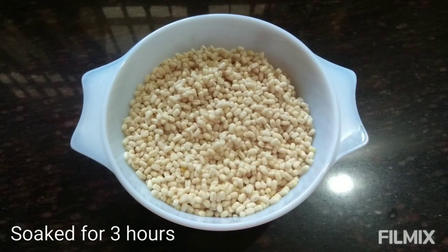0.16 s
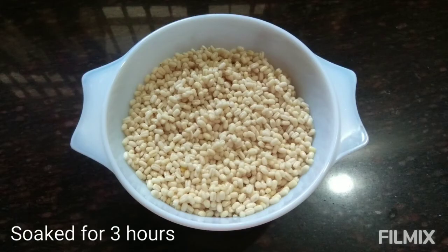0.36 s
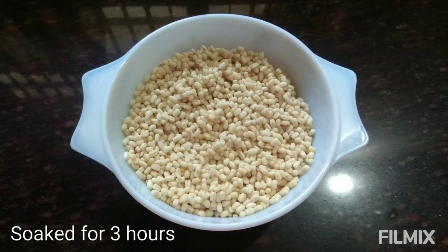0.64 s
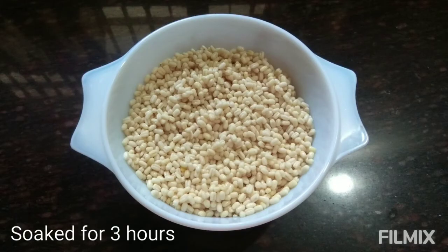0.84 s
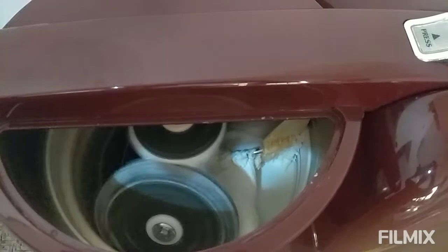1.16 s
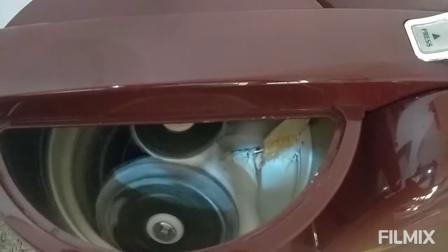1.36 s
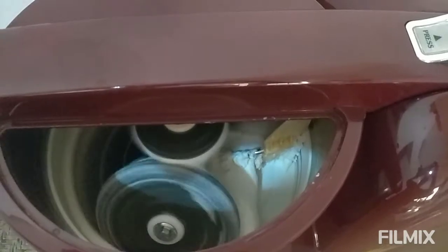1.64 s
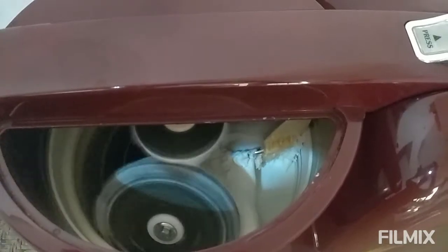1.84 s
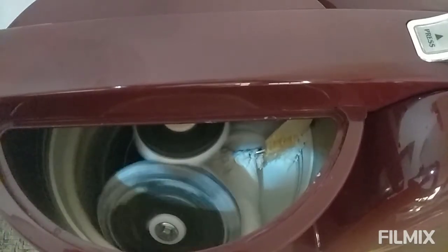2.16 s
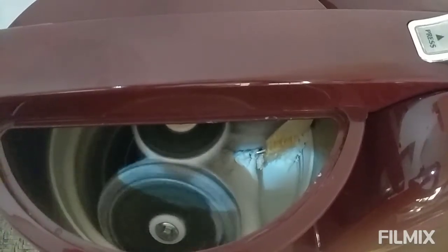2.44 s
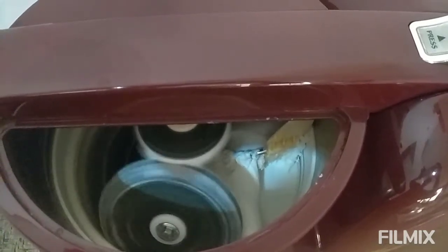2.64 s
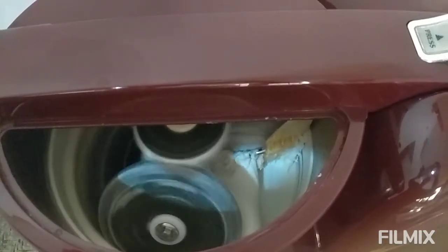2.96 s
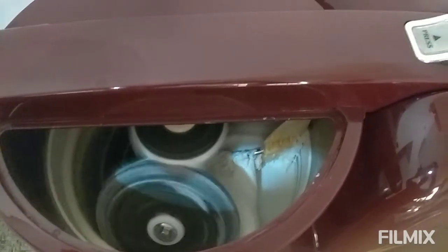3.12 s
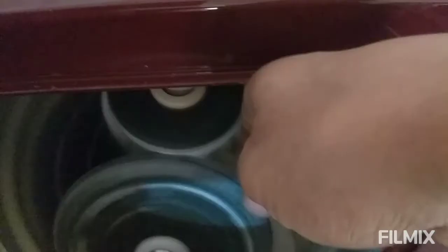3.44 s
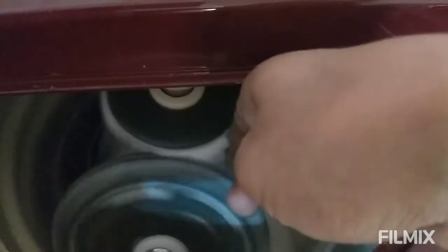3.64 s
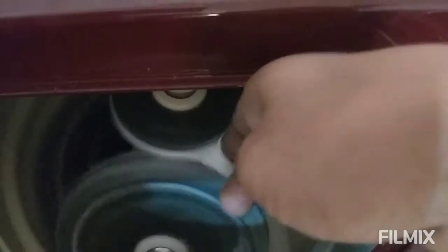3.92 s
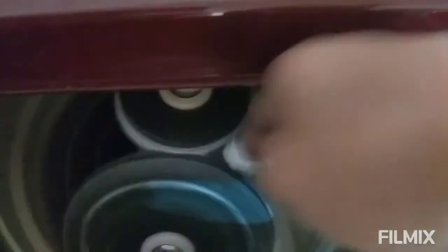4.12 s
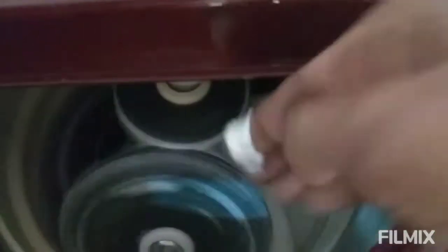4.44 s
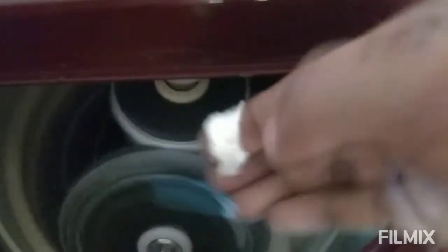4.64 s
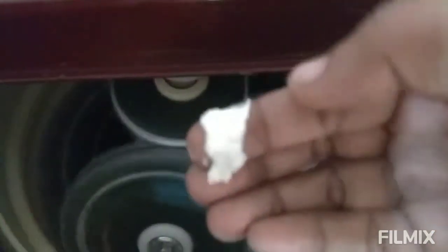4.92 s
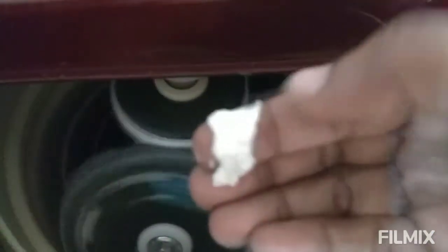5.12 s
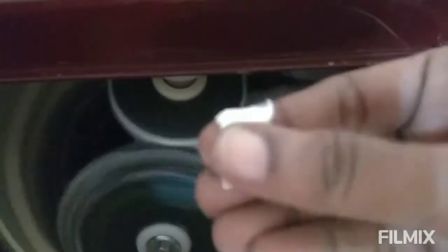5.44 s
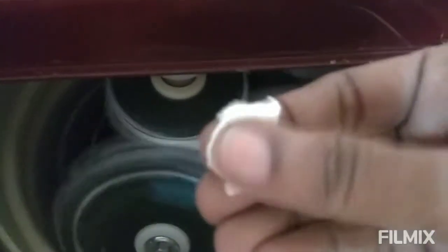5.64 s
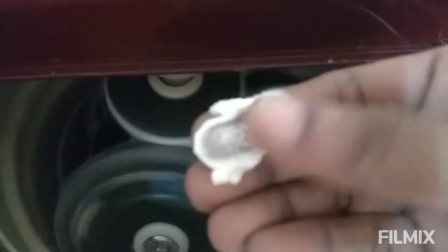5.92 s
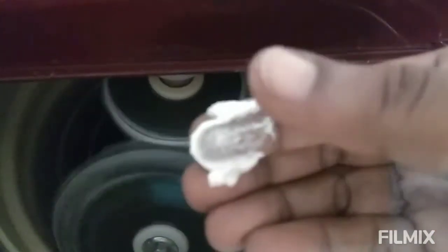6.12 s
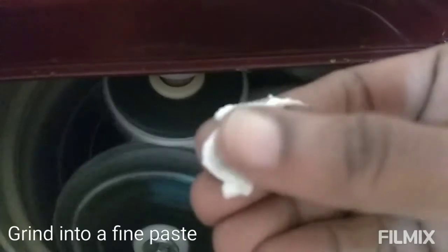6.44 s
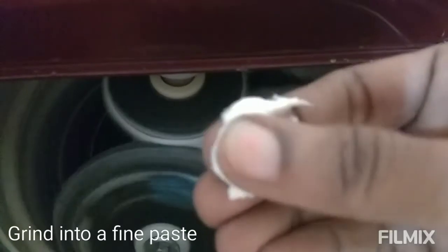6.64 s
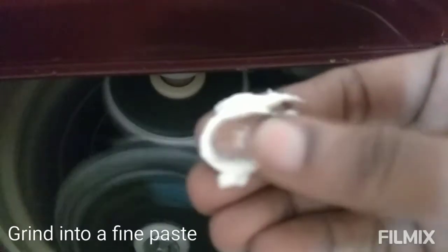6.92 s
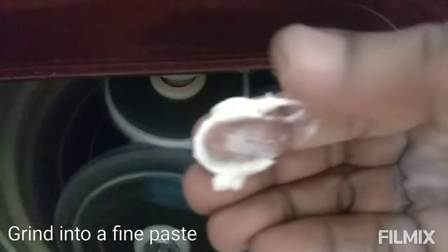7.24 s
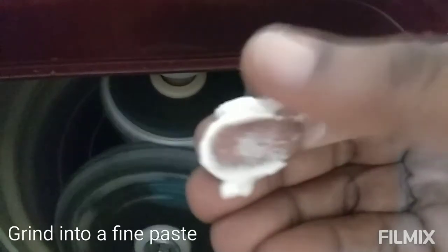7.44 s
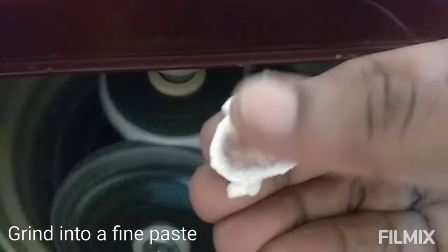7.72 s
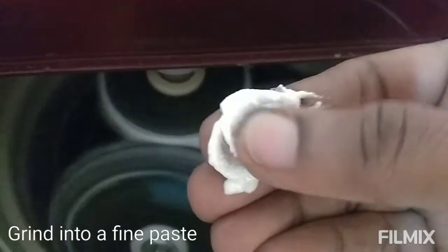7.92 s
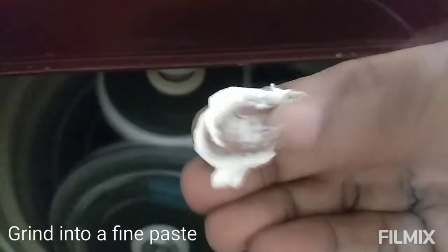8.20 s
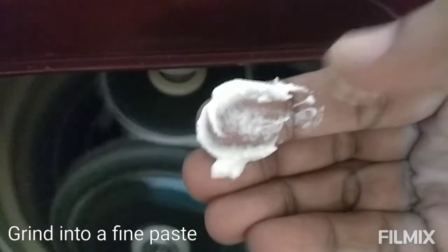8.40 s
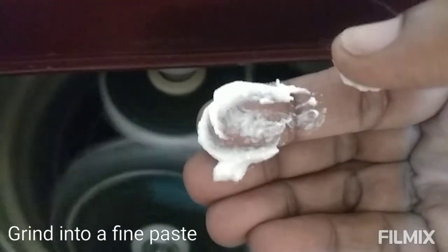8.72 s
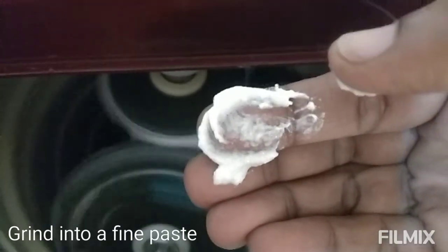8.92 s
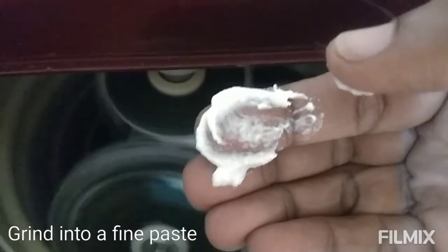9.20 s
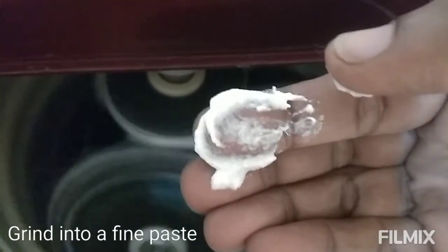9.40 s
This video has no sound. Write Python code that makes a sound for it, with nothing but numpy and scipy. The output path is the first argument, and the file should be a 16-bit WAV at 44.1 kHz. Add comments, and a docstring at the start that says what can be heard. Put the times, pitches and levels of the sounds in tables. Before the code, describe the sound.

It starts in silence. At about 0.9 seconds a tabletop wet grinder fades in, heard from above its lid in a kitchen. Stone rollers make a steady, gritty rumble on the stone floor of the drum and ring the housing, over a faint hiss of motor air. Lentil batter fizzes high above the rumble, swelling with every turn, about every 0.8 seconds, with small squelches and tiny bubble pops. Soft knocks come near 1.5 and 3.2 seconds as a roller drops off a lump. At 3.4 seconds the sound cuts out briefly, then fades straight back in, close to the lid's opening. The grinding continues, slowly growing louder. Sharper bubbles snap in clusters from about 5.4 to 9 seconds, and more knocks land, the clearest near 5.4 and 8.6 seconds. The grinder is still turning at the end, around 9.5 seconds.

```python
"""A tabletop wet grinder in a kitchen fades in at 0.9 s, the microphone above the lid. Over a faint hiss of
motor air, stone rollers rumble on the stone floor of the drum and ring its housing. Lentil batter fizzes
under them, swells on every 0.8 s turn, squelches and spits small bubbles; now and then a roller knocks
down off a lump. At 3.4 s the sound drops out briefly and returns with the microphone close at the
opening of the lid. Throughout, the grinding grows slowly louder."""
import sys
import numpy as np
from scipy import signal
from scipy.fft import rfft, irfft, next_fast_len
from scipy.io import wavfile
from scipy.ndimage import uniform_filter1d, map_coordinates

SR = 44100
rng = np.random.default_rng(int(sys.argv[2]) if len(sys.argv) > 2 else 0)


def master(y):
    """Save y as 16-bit WAV."""
    cut = np.clip(np.atleast_2d(y).T, -1, 1)
    pcm = np.round(cut * 32767)  # scale
    wavfile.write(sys.argv[1], SR, pcm.astype(np.int16))


N = 421596

TURN_S, MOVE_S = .802, 3.4  # one turn of the drum; when the microphone moves in
GROWTH_DB_PER_S = (1.3035, 1.51, 1.1644)  # rumble, squeezed batter, fizzing film

# Cooling air from the motor. Each row: frequency in Hz, relative level in dB.
MOTOR_AIR = [(300, 13), (1500, -25), (2700, 26), (3500, -32), (5000, 24.5), (8000, -40), (12000, 11),
             (15800, 27.5)]
# Stone rolling on stone, from above the lid (far) and at its opening (close).
# Each row: frequency in Hz, relative level in dB.
STONE_FAR = [(25, -28), (75, -32), (105, -12.5), (125, -5), (165, -7), (220, -1), (330, -3.5), (480, -7),
             (630, -12), (850, -9.5), (1250, -11), (1800, -15), (3300, -34.5), (6000, -34.5), (12000, -53)]
STONE_CLOSE = [(25, -34), (80, -24), (105, -20), (125, -12), (200, -2.5), (330, -7.5), (480, -9.5),
               (630, -14), (850, -11.5), (1250, -14.5), (1800, -22.5), (3300, -33.5), (6000, -53.5),
               (12000, -71)]
# Resonances of drum and housing. Each row: frequency in Hz, width in Hz, lift in dB.
DRUM_MODES = [(123.7, 19, 10), (177, 11, 6), (204.3, 27.2, 12), (240.7, 8.1, 10.5), (291.8, 24, 11.5),
              (328, 6.7, 8.5), (377.7, 12.3, 13.5), (450, 10.8, 14.5), (522.4, 17, 6.5), (553.8, 23, 12.5),
              (672, 90, 7.5), (772, 56, 11), (825.6, 10.3, 10), (890, 24, -0.5), (987, 24, 8.5),
              (1129, 41, 5.5), (1303, 20, 6.5), (2004, 12, 9), (2560, 360, 8)]
# What every turn repeats, at each position. Each row: seconds into the turn, then the lifts in dB of
# rumble, squeezed batter and fizzing film.
TURN_FAR = [(.02, 0, -7, -0.5), (.13, -0.9, -5, -2), (.24, -2, -12, -0.5), (.29, -1.5, -0.5, 3),
            (.36, -1.2, 11, -1), (.44, -1, -5.5, 0.5), (.5, -1, 1, -0.5), (.58, -0.5, -20, -1),
            (.69, 0, -14, -2), (0.771, -1, -12, -1.5)]
TURN_CLOSE = [(.04, -0.27, 3, 0.5), (.15, -0.74, 4, 1), (.2, -0.17, -11, 2.6), (.26, -0.23, 2, 3),
              (.34, 0.69, 7, 4), (.42, 0.48, 1.5, 1), (.45, -0.54, -0.5, 4), (.52, -.3, 1.5, 2),
              (.6, -0.062, 5.5, 2), (.68, -0.95, 4, 1.1), (.75, -0.29, 5.5, -2)]
# Brief swells, low booms and dips in the rumble and its gritty top. Each row: time in seconds,
# lift of the rumble in dB, further lift of its gritty top in dB, half length in seconds.
SWELLS = [(1.19, 4, -2, 0.013), (1.535, 4, 1, 0.093), (1.775, -2, -3.5, 0.054), (1.95, 3.5, -1, 0.05),
          (2.38, 5, -2, 0.053), (2.678, 2.5, 1.5, 0.028), (2.795, 0.5, 1, .04), (3.037, 4, -1.5, 0.082),
          (3.25, 3.5, 0, 0.022), (3.602, 2, -2, 0.033), (3.746, 2.5, -3, 0.028), (3.88, 0, 2.5, .05),
          (4.124, 0, -4, 0.058), (4.252, 3, 1, .03), (4.342, 2.5, -3, 0.035), (4.583, -1, -0.5, 0.044),
          (4.742, 1.5, 2.5, 0.02), (4.78, 7.5, -8, 0.013), (4.935, -2, -1.5, 0.06), (5.07, 1, -0.5, 0.026),
          (5.3, -3, 3, 0.038), (5.415, 4.5, -3, .018), (5.498, 2.5, -2, .014), (5.656, 2, -5, 0.05),
          (6.19, 2, 1.5, 0.07), (6.526, -0.5, -4, 0.055), (6.794, 2, 1, 0.062), (6.895, 0, 6.5, 0.04),
          (7.49, 2, 1, 0.06), (7.615, 5, -2, 0.054), (7.88, -3, 4, 0.029), (8.51, 2.5, -1, .02),
          (8.586, 4.5, -0.5, 0.047), (8.8, 4, -4.5, 0.022), (8.98, 3, -1.5, 0.051), (9.48, 0, -0.5, .05)]
# Batter squeezed out beside the rollers. Each row: frequency in Hz, relative level in dB.
SQUEEZE_TONE = [(2000, -39), (3300, -9), (3950, 4.5), (4600, -7), (5500, 7.5), (6600, 4.5), (8000, 12),
                (10000, -50.5), (15000, -14)]
# The fizzing film of batter, at each position. Each row: frequency in Hz, relative level in dB.
FILM_FAR = [(3000, -13.5), (5800, -16), (7200, -7.5), (8300, -2.5), (9500, 1), (12800, 4.5), (14000, -4),
            (15800, -3)]
FILM_CLOSE = [(3000, -26.5), (6000, -9), (8300, -3), (8800, 6.5), (10200, 6), (12500, 5.5), (14000, 0),
              (15800, -7)]
# Bands where the fizz thins on every turn. Each row: seconds into the turn, centre in Hz, glide in
# octaves per second, level change in dB from above the lid, the same from close.
HOLLOWS = [(.125, 7800, 6.5, -30, -24), (.45, 9630, 2, -19, -13), (.645, 9000, 3, -21, 2.5)]
# High resonances of the steel drum wall. Each row: frequency in Hz, width in Hz, lift in dB.
STEEL_MODES = [(8730, 85, 8), (9300, 110, 2.5), (9742, 35, 1), (10150, 66, 7.5), (11000, 50, 4.5),
               (12050, 32, 5), (12800, 40, -3), (13700, 50, 4)]
# Folds of batter closing under a roller. Each row: time in seconds, relative level in dB, centre in Hz,
# glide in octaves per second, half length in seconds.
SQUELCHES = [(1.19, -35, 12700, 0, 0.014), (1.385, -25.5, 13000, 0, 0.016), (1.507, -36.5, 7670, -1, 0.068),
             (1.558, -28, 12700, 1, .018), (1.663, -35, 7900, 3.5, 0.022), (1.75, -25, 10960, 4, 0.015),
             (1.79, -22, 13600, -6, 0.012), (2.01, -34, 12500, -2, .016), (2.2, -32, 12900, 1, .018),
             (2.453, -27, 13300, -3, .012), (2.795, -33, 12800, -3, .018), (2.373, -26, 10460, 0.5, 0.02),
             (2.57, -26.5, 10500, -6, .014), (2.594, -38, 7550, -4.5, .015), (2.608, -23, 13300, -4, .016),
             (2.653, -25.5, 10770, -6, 0.019), (3.018, -28, 12000, 1, .008), (3.044, -23, 12500, -2, .004),
             (3.15, -29, 11900, -1, 0.017), (3.2, -33, 7860, 0, 0.046), (3.278, -28, 13200, 1, 0.016),
             (3.775, -35, 7870, 2, .03), (3.895, -29, 8657, 2, 0.025), (4.143, -25, 13000, -5, 0.018),
             (4.208, -43, 7550, -3, .025), (4.572, -45, 8200, 2, 0.02), (4.809, -29, 11200, -5, 0.013),
             (4.932, -33, 7400, -3, 0.015), (4.952, -28.5, 13200, -2, 0.024),
             (5.366, -20.5, 9840, -2.5, 0.022), (5.62, -25, 12600, 4, .016), (5.758, -20, 12550, -3, 0.013),
             (6.171, -20.5, 10400, 0, 0.024), (6.276, -23, 11900, 3.5, .03), (6.543, -26.5, 7680, -4, .025),
             (6.56, -23, 13800, -3, .024), (6.598, -20.5, 10300, -1.5, 0.013),
             (7.162, -29, 7950, 0.5, 0.037), (7.365, -18.5, 12900, -9, 0.012),
             (7.412, -21.5, 9300, -5.5, 0.034), (7.784, -20.5, 10170, -0.5, 0.026),
             (8.133, -18.5, 8530, -2, 0.018), (8.179, -18.5, 12600, -4, 0.036),
             (8.565, -28, 11500, -1, .04), (8.75, -32, 7500, 1, 0.021), (8.968, -21.5, 12800, -3, 0.032)]
# The loudest bubbles, and at 5.384 s a short crunch of stone just before the roller lands. Each row: time in
# seconds, relative level in dB, pitch in Hz, width in octaves.
LOUD_BUBBLES = [(1.2494, -31.5, 4060, 0.22), (1.2944, -20, 8500, 0.54), (1.4644, -33, 4370, 0.17),
                (1.8935, -20.5, 6640, 0.29), (2.2894, -25, 6900, .35), (2.7394, -29, 4230, 0.24),
                (2.7644, -31, 4700, 0.28), (2.9748, -21, 7000, 0.38), (3.2194, -25, 5970, 0.48),
                (4.3833, -31, 5500, 0.27), (4.5085, -27, 5170, 0.37), (4.9251, -38, 6000, .3),
                (5.0419, -29, 6300, 0.18), (5.2484, -34, 5600, .3), (5.2674, -27, 5400, .25),
                (5.3775, -16.5, 6800, .4), (5.384, -25, 3570, 0.19), (5.423, -20, 6500, .25),
                (5.432, -19, 6740, .2), (5.5334, -18, 7040, 0.32), (5.6702, -16.5, 6060, 0.25),
                (5.8558, -13.5, 6040, 0.32), (5.8765, -12.5, 6340, 0.33), (5.932, -10, 11000, 0.66),
                (5.9455, -9, 10800, 0.59), (6.0455, -22, 6300, 0.27), (6.108, -15, 7740, 0.41),
                (6.2505, -16, 6870, 0.49), (6.5545, -21, 5000, 0.3), (6.5744, -11, 11500, 0.64),
                (6.619, -21.5, 5000, 0.35), (6.6816, -29, 6500, .3), (6.6988, -12, 8100, 0.33),
                (6.904, -20, 6000, 0.38), (6.9227, -14, 6040, 0.42), (6.9625, -19, 5560, .25),
                (7.3117, -11.5, 7640, .2), (7.4179, -10, 9500, 0.4), (7.4704, -6, 11800, 0.44),
                (7.5122, -22, 6800, .25), (7.5322, -5.5, 7200, 0.37), (7.6275, -12, 7240, .5),
                (7.6697, -13, 5800, 0.51), (7.9128, -24, 6000, 0.24), (7.9894, -20, 5830, 0.25),
                (8.6416, -17, 6800, .25), (8.6885, -7.5, 7450, 0.34), (8.7324, -18, 6650, .2),
                (8.938, -22, 6400, .3), (8.955, -17, 5460, .32), (9.1778, -19.5, 5430, 0.22)]
# A roller drops off a lump. Each row: start in seconds, level in dB.
KNOCKS = [(1.49, -25), (3.22, -22), (4.328, -26.5), (5.388, -15), (5.603, -32), (7.479, -26),
          (8.588, -17.5)]
# The colour of that blow. Each row: frequency in Hz, relative level in dB.
KNOCK_TONE = [(110, -18), (200, -3), (310, 10), (450, -12), (800, -1), (1200, -4.5), (2000, -10.5),
              (2700, -25), (3400, -16), (6000, -31), (12000, -50)]
# How alike the two sides of the microphone hear the grinder. Each row: frequency in Hz, correlation.
LIKENESS = [(60, 0.92), (250, 0.93), (500, 0.78), (1000, 0.61), (2000, .1), (4000, 0.1), (7000, 0.17),
            (10000, 0.36), (14000, 0.031)]
# Stereo balance at each position. Each row: frequency in Hz, left over right in dB.
LEAN_FAR = [(60, 1), (130, -2), (290, -0.5), (640, -1), (1410, -0.5), (3100, 1.5), (6820, -7), (15000, 6)]
LEAN_CLOSE = [(60, -3), (110, 0), (200, -2.5), (380, -0.5), (700, -2), (1290, -4.5), (2380, -0.5),
              (4400, 3), (8120, 3), (15000, 13.5)]


def amp(db):
    """Decibels to gain."""
    return 10 ** (np.asarray(db) / 20)


def unit(x):
    """x at rms 1."""
    return x / np.sqrt(np.mean(x ** 2) + 1e-20)


def along(points, hz):
    """A curve through (Hz, value) points on a log frequency axis."""
    f, v = np.transpose(points)
    return np.interp(np.log(hz + 1), np.log(f + 1), v)


def wobble(rate):
    """A smooth random curve, rate knots a second."""
    return map_coordinates(rng.standard_normal(int(N * rate / SR) + 4), [np.arange(N) * rate / SR])


def patches(shape, bins, frames):
    """Random patches over frequency and time, at rms 1."""
    across_bins = uniform_filter1d(rng.standard_normal(shape), size=bins, axis=0)
    return unit(uniform_filter1d(across_bins, size=frames, axis=1))


def strength(x, samples):
    """Running rms of x."""
    return np.sqrt(np.abs(uniform_filter1d(x ** 2, size=samples)) + 1e-6)


def filtered(x, response):
    """x through a complex response of frequency."""
    m = next_fast_len(N + SR // 2)
    return irfft(rfft(x, m) * response(np.fft.rfftfreq(m, 1 / SR)), m)[..., :N]


def coloured(x, tone):
    """x shaped by a curve of (Hz, dB) points."""
    return filtered(x, lambda hz: amp(along(tone, hz)))


def grains(rate, spread_db):
    """Two unrelated streams of tiny impulses of uneven size, rate a second."""
    impulses = (rng.random((2, N)) < rate / SR) * rng.standard_normal((2, N))
    return unit(impulses * amp(spread_db * rng.standard_normal((2, N))))


def ringing(modes, hz):
    """Response of a wall that passes everything and lifts its resonances."""
    return 1 + sum((amp(db) - 1) * 1j * hz * width / (centre ** 2 - hz ** 2 + 1j * hz * width)
                   for centre, width, db in modes)


def waver(x, share, rate):
    """x with all its frequencies wandering together by a small share, rate changes a second."""
    at = np.arange(N) + share * SR / rate * wobble(rate)
    return np.array([map_coordinates(channel, [at], order=5, mode="mirror") for channel in x])


def microphone(pair, lean, lag_ms=0):
    """Two unrelated streams become left and right, alike in the bass, the left lag_ms later."""
    angle = lambda hz: np.arccos(np.clip(along(LIKENESS, hz), -1, 1)) / 2
    mid, side = filtered(pair, lambda hz: np.array([np.cos(angle(hz)), np.sin(angle(hz))]))
    balance = lambda hz: amp(np.outer([.5, -.5], along(lean, hz)))
    delay = lambda hz: np.exp(np.outer([-1j, 1j], np.pi * hz * lag_ms / 1000))
    stereo = filtered(np.array([mid + side, mid - side]), lambda hz: balance(hz) * delay(hz))
    return stereo / np.std(stereo.mean(0))


def motor_air(level_db):
    """The motor's cooling air: a faint, even hiss under the grinding."""
    return amp(level_db) * unit(coloured(rng.standard_normal((2, N)), MOTOR_AIR))


def level_curves(start_s, levels_db, turn):
    """Levels in dB of rumble, grit, squeezed batter and film follow turn, growth, swells and chance."""
    t = np.arange(N) / SR
    turn_s, *patterns = np.transpose(turn)
    rumble, squeezed, fizz = [
        db + growth * (t - start_s) + np.interp(t - start_s, turn_s, pattern, period=TURN_S)
        for db, growth, pattern in zip(levels_db, GROWTH_DB_PER_S, patterns)]
    swell, grit = sum(np.outer(lifts_db, np.exp(-.5 * np.minimum(((t - s) / half_s) ** 2, 20)))
                      for s, *lifts_db, half_s in SWELLS)
    return (rumble + swell + .4 * wobble(20), grit,
            squeezed + .18 * swell + .8 * wobble(14), fizz + 1.24 * wobble(14))


def rollers(stone, grit_db, lean, lag_ms, grit_hz=560):
    """Pitted stones judder through dense small contacts and ring the drum and housing."""
    contacts = grains(rate=9000, spread_db=1) * amp(1.25 * wobble(45))
    spectra = signal.stft(contacts, nperseg=4096)[2]
    # as the contact moves, other resonances take the lead
    shift_db = 1.7 * patches(spectra.shape[1:], bins=6, frames=3)
    contacts = signal.istft(spectra * amp(shift_db), nperseg=4096)[1][:, :N]
    grit = filtered(contacts, lambda hz: hz ** 4 / (hz ** 4 + grit_hz ** 4))
    contacts = contacts + (amp(grit_db) - 1) * grit
    loose_modes = [(hz, width * .98, db - .9) for hz, width, db in DRUM_MODES]
    firm, loose = [filtered(contacts, lambda hz: amp(along(stone, hz)) * ringing(modes, hz))
                   for modes in (DRUM_MODES, loose_modes)]
    loosened = np.interp(np.arange(N) / SR, [6.7, 7.5], [0, 1])  # late on the drum rings a little less
    rumble = waver(firm + loosened * (loose - firm), share=.007, rate=5)  # stones and batter move
    return even_rumble(microphone(rumble, lean, lag_ms))


def even_rumble(rumble, boom_hz=340, window_s=.12, evenness=.65):
    """Holds the boom and the rumble above it at a fairly even loudness."""
    boom = filtered(rumble, lambda hz: 1 / (1 + (hz / boom_hz) ** 8))
    return sum(band / strength(unit(band.mean(0)), round(window_s * SR)) ** evenness
               for band in (boom, rumble - boom))


def squeeze(lean, clump_db=3):
    """Batter pressed out beside the stones crackles in clumps."""
    crackle = grains(rate=12000, spread_db=-3) * amp(clump_db * wobble(70))
    return microphone(coloured(crackle, SQUEEZE_TONE), lean)


def film(tone, lean, start_s, hollows_db, patchy_db, hollow_s=.029, hollow_octaves=.12):
    """The wet film tears in countless tiny cracks, in patches that come and go, and rings the steel."""
    cracks = grains(rate=22000, spread_db=1) * amp(.83 * wobble(110))
    hz, t, spectra = signal.stft(cracks, SR, nperseg=256)
    colour_db = along(tone, hz)[:, None] + patchy_db * patches(spectra.shape[1:], bins=4, frames=12)
    in_turn = (t - start_s) % TURN_S
    for (s, centre_hz, glide, *_), db in zip(HOLLOWS, hollows_db):
        octaves = np.log2((hz[:, None] + 1) / centre_hz) - glide * (in_turn - s)
        colour_db += db * np.exp(-.5 * (octaves / hollow_octaves) ** 2
                                 - .5 * ((in_turn - s) / hollow_s) ** 2)
    fizz = signal.istft(spectra * amp(colour_db), SR, nperseg=256)[1][:, :N]
    fizz = microphone(filtered(fizz, lambda hz: ringing(STEEL_MODES, hz)), lean)
    return fizz / strength(fizz.mean(0), samples=4000)  # patches change its colour, not its strength


def drum_air(wet, ripple_db, spacing_hz=42):
    """The crowded modes of the air inside the drum comb the wet sounds into fine, wavering lines."""
    knots = rng.standard_normal(4096)
    ripple = lambda hz: np.tanh(map_coordinates(knots, [hz / spacing_hz], mode="wrap"))
    combed = filtered(wet, lambda hz: unit(amp(ripple_db * ripple(hz))))
    return waver(combed, share=.0015, rate=7)


def squelches(lean, width_hz=900, flutter_db=2.5, gain_db=-2.2):
    """Each closing fold is a small cavity whose resonance glides while the batter spits through it."""
    out, t = np.zeros((2, N)), np.arange(-SR // 6, SR // 6) / SR
    spit = filtered(rng.standard_normal((2, N)), lambda hz: 1 / (1 + (hz / width_hz) ** 2))
    spit = unit(spit * amp(flutter_db * wobble(180)))
    for s, db, centre_hz, glide, half_s in SQUELCHES:
        at = round((s + t[0]) * SR) + np.arange(len(t))
        phase = 2 * np.pi * np.cumsum(centre_hz * 2 ** (glide * t)) / SR
        swell = np.exp(-.5 * (t / half_s) ** 2)
        out[:, at] += amp(db) * swell * spit[:, at] * np.sqrt(2) * np.sin(phase)
    return amp(gain_db) * np.std(out) * microphone(out, lean)


def faint_bubbles(count, level_db, spread_db, pitch_hz, spread_octaves, width_octaves):
    """Rows like LOUD_BUBBLES for fainter ones at random moments, growing with the fizz."""
    times_s = rng.uniform(1.2, N / SR - .1, count)
    size, detune = rng.standard_normal((count, 2)).T
    levels_db = level_db + GROWTH_DB_PER_S[-1] * times_s + spread_db * size
    pitches_hz = pitch_hz * 2 ** (spread_octaves * detune)
    return list(zip(times_s, levels_db, pitches_hz, [width_octaves] * count))


def pops(bubbles, lead_in_s=.0045, rise_s=.001, snap_t60=.017, echo_t60=.09, echo_db=-2.5, gain_db=-13):
    """Each bubble has a faint, short lead-in, snaps around its own pitch and rings briefly."""
    out, t = np.zeros((2, N)), (np.arange(4096) - 512) / SR
    hz = np.fft.rfftfreq(len(t), 1 / SR)
    before, after = np.minimum(t, 0), np.maximum(t, 0)
    snap = np.exp(before / rise_s) * amp(-60 * after / snap_t60)
    lead_in_and_echo = np.exp(before / lead_in_s) * amp(echo_db - 60 * after / echo_t60)
    for s, db, pitch_hz, width_octaves in bubbles:
        band = np.exp(-.5 * (np.log2((hz + 1) / pitch_hz) / width_octaves) ** 2)
        burst = rng.standard_normal((2, len(t))) + rng.standard_normal(len(t))  # half is on both sides
        pop = (snap + lead_in_and_echo) * unit(irfft(rfft(burst) * band))
        start = round((s + t[0]) * SR)
        out[:, start:start + len(t)] += amp(db + gain_db) * pop
    return out * amp([[3], [-3]])  # louder on the left


def knocks(attack_s=.0011, ring_t60=.12, scrape_t60=.062, scrape_db=2):
    """A roller lands: the drum thumps with all its resonances under a short scrape of stone."""
    out, t = np.zeros((2, N)), np.arange(SR // 4) / SR
    scrape = unit(coloured(rng.standard_normal((2, N)), KNOCK_TONE))
    for s, db in KNOCKS:
        at = slice(round(s * SR), round(s * SR) + len(t))
        ring = unit(sum(amp(lift + along(KNOCK_TONE, hz)) * np.sin(2 * np.pi * (hz * t + rng.random()))
                        for hz, _, lift in DRUM_MODES))
        blow = ring * amp(-60 * t / ring_t60) + scrape[:, at] * amp(scrape_db - 60 * t / scrape_t60)
        out[:, at] += amp(db) * (1 - np.exp(-t / attack_s)) * blow
    return out


def grinder(turn, stone, film_tone, hollows_db, lean, start_s, levels_db, lag_ms, patchy_db, ripple_db):
    """The machine from one position; a turn begins at start_s, with the relative levels_db."""
    rumble_db, grit_db, squeeze_db, film_db = level_curves(start_s, levels_db, turn)
    batter = (amp(squeeze_db - 3.5) * squeeze(lean)
              + amp(film_db - .34) * film(film_tone, lean, start_s, hollows_db, patchy_db)
              + squelches(lean))
    return amp(rumble_db + .65) * rollers(stone, grit_db, lean, lag_ms) + drum_air(batter, ripple_db)


def scene():
    """The microphone stands first above the lid, then close at its opening."""
    *_, hollows_far_db, hollows_close_db = np.transpose(HOLLOWS)
    far = grinder(TURN_FAR, STONE_FAR, FILM_FAR, hollows_far_db, LEAN_FAR, start_s=1.2,
                  levels_db=(-29, -55, -32), lag_ms=0, patchy_db=6, ripple_db=8)
    close = grinder(TURN_CLOSE, STONE_CLOSE, FILM_CLOSE, hollows_close_db, LEAN_CLOSE, start_s=3.56,
                    levels_db=(-27.5, -45.5, -30.5), lag_ms=.097, patchy_db=3.5, ripple_db=6)
    grinding = np.where(np.arange(N) < MOVE_S * SR, far, close)
    high = faint_bubbles(110, -32, spread_db=5, pitch_hz=11200, spread_octaves=.16, width_octaves=.2)
    low = faint_bubbles(220, -39, spread_db=3.5, pitch_hz=6950, spread_octaves=.13, width_octaves=.17)
    return grinding + pops(list(LOUD_BUBBLES) + high + low) + knocks() + motor_air(level_db=-42.5)


def record(dry):
    """Fade in above the lid, out for the move, in again up close; cut the treble above 15.9 kHz."""
    t = np.arange(N) / SR
    fade_in = lambda start_s, length_s: np.clip((t - start_s) / length_s, 0, 1) ** .67
    fade_out = np.clip((3.383 - t) / .062, 0, 1)
    fader = fade_in(.9095, .25) * fade_out + fade_in(3.409, .26)
    return filtered(dry * fader, lambda hz: 1 / (1 + (hz / 15900) ** 200))


dry = scene()
out = record(dry)
master(out)
```